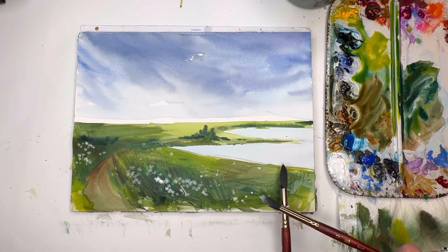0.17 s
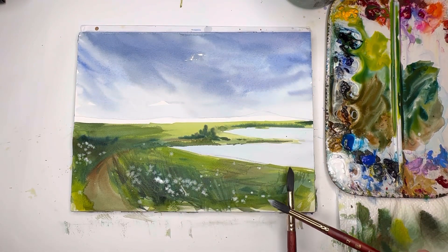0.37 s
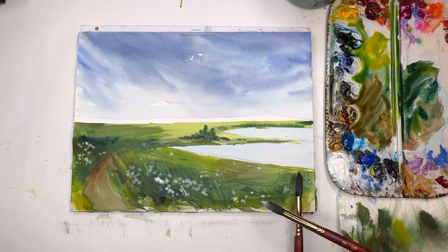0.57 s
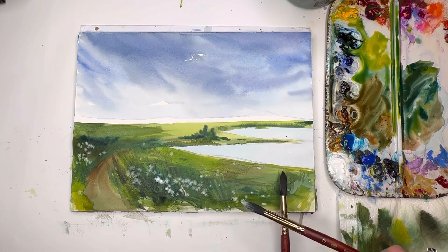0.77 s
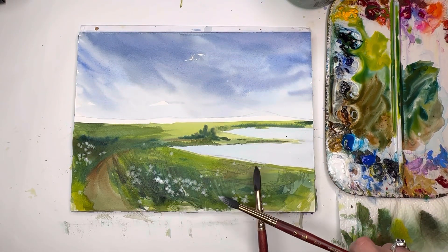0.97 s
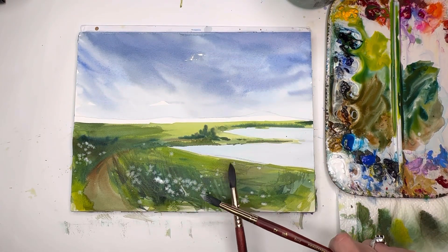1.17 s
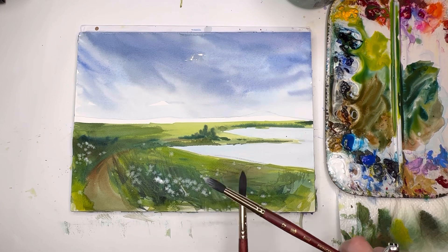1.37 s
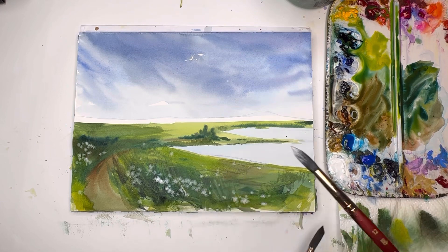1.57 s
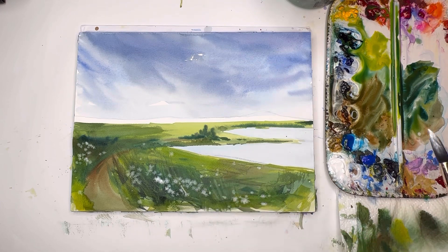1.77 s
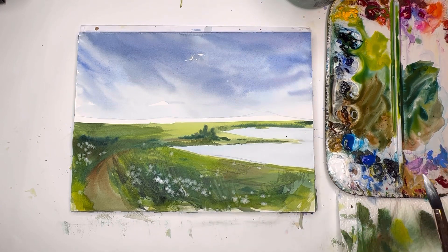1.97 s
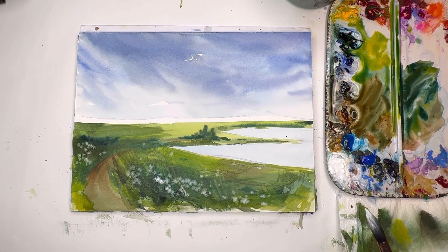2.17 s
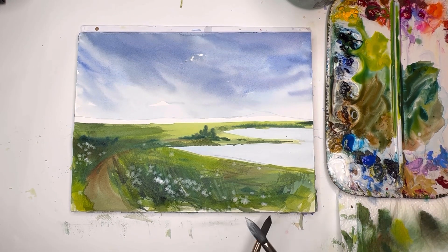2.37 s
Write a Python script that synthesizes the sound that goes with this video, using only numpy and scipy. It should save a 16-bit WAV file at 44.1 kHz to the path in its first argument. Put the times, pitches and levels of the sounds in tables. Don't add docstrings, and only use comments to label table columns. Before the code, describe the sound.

Two paintbrush handles knock together in nine quick, bright, even clicks in a small room

```python
import sys
import numpy as np
from scipy import signal
from scipy.fft import rfft, irfft
from scipy.io import wavfile
from scipy.ndimage import uniform_filter1d

SR = 44100
rng = np.random.default_rng(int(sys.argv[2]) if len(sys.argv) > 2 else 0)


def voltage_ratio(decibels):
    exponent = np.asarray(decibels, float) / 20
    return 10 ** exponent


def store_pcm(level_fs):
    pcm = np.round(np.clip(level_fs, -1, 1) * 32767).astype(np.int16)
    wavfile.write(sys.argv[1], SR, np.atleast_2d(pcm).T)


N = 106457
PAD = 441

KNOCK_S = [-.0008, .1789, .3275, .4950, .6490, .8283, 1.0018, 1.1593, 1.3112]
# (peak level [dB], low ring [dB], middle ring [dB], high ring [dB])
KNOCKS = [
    (-4.5, -1.5, -5, 5),
    (-2, -5, 2, 2.5),
    (-10, -13, -1.5, 4),
    (-4.5, 4, 5, 2.5),
    (-6, 4, 1.5, 0.5),
    (-5, 3, -2.5, 5),
    (-2.5, 3.5, -1, 6.5),
    (-7, 1, 0.5, 1),
    (-10.5, -7, 2, 2),
]
# (handle ring [dB], thud [dB], crack [dB], room snap [dB])
GRIP = [
    (2, -11, -8.5, 4.5),
    (2.5, 4.5, 3, 0),
    (3.5, -20, 5.5, 5.5),
    (0, -13, -3, 0),
    (2, -15, 2.5, -2.5),
    (-3, -7, -10.5, -14.5),
    (-10, 16, 1.5, -6.5),
    (0.5, -12.5, 4.5, 1.5),
    (2, -6, 1.5, -15.5),
]
# (low [Hz], middle [Hz], high [Hz])
SPOT_HZ = [(4900, 7850, 10400), (4670, 7300, 10300), (5250, 6750, 10300), (5400, 7150, 10100),
           (5250, 7700, 11300), (5250, 7500, 10400), (5450, 7400, 10050), (5500, 7600, 10750),
           (5400, 7350, 10600)]
# (low [Hz], middle [Hz], high [Hz])
USUAL_RING_HZ = (5250, 7400, 10400)
CHATTER_S = [.0017, .0013, .0015, .0009, .0014, .0013, .0013, .0014, .0013]
BOUNCE_S = [.0058, .3351, .3408, .499, .6582, .6652, .8435, 1.0113, 1.0169, 1.1705, 1.175, 1.3242]
BOUNCE_DB = [-15, -17, -33.5, -28, -16, -18.5, -13.5, -21, -11.5, -13, -22.5, -24.5]
# (frequency [Hz], level [dB], T60 [s])
LOW_RING = [(4416, -21, 0.0043), (5240, -9, .022), (5775, -10.5, 0.0085)]
MID_RING = [(6630, -10, 0.014), (7364, -5, 0.017), (8026, -12.5, 0.014)]
HIGH_RING = [(10396, -4.5, 0.0096), (11600, -8, 0.0057), (12900, -20.5, 0.01052), (13810, -25, 0.0046)]
# (frequency [Hz], level [dB], T60 [s])
HANDLE = [(955, -22.5, 0.025), (1032, -31, 0.039), (1130, -32.5, 0.021), (1830, -36, 0.018),
          (2580, -22, 0.0053), (3070, -14, 0.0039)]
# (frequency [Hz], level [dB])
CRACK = [(600, -47.5), (1200, -13.5), (2500, -16), (5000, 2), (9000, -3.5), (13000, -5), (15500, -17.5),
         (17000, -36)]
# (time [s], level [dB])
TICKS = [
    (1.669, -44),
    (2.232, -49),
    (2.2538, -68),
    (2.3869, -39.5),
    (2.402, -49),
]
# (frequency [Hz], T60 [s])
ROOM_T60 = [(500, 0.2077), (1000, .26), (1900, 0.35), (3500, 0.23), (9000, 0.25), (15000, .22)]
# (frequency [Hz], level [dB])
ROOM_TINT = [(500, -8.5), (1000, -4), (1900, -3.5), (5000, -0.5), (8000, -2.5), (11000, -9.5), (14600, -3),
             (16000, -22.5)]
# (frequency [Hz], level [dB per Hz])
HISS = [(200, 0), (350, -2), (480, -7), (900, -10), (1600, -13), (6300, -14), (10000, -13), (16000, -23)]
# (frequency [Hz], level [dB per Hz])
RUMBLE = [(4.7, -30), (8.0, 8), (16, 6.5), (27, -11.5), (65, -11), (147, -25), (200, -26), (260, -63),
          (440, -120)]
# (frequency [Hz], level [dB])
HUM = [(59.5, -62), (119.5, -75.5), (140, -72.5), (238, -82.5)]
# (time [s], level [dB])
BRISTLE = [
    (1.5, -76),
    (1.701, -77.5),
    (2.05, -102),
    (2.14, -73),
    (2.2, -87),
]
# (frequency [Hz], level [dB])
BRISTLE_TINT = [(4000, -23.5), (6000, -7), (9500, 1.5), (12500, -6), (15000, -27)]
# (time [s], level [dB], frequency [Hz], T60 [s])
JOLTS = [
    (2.356, -24.5, 25, .2),
    (2.397, -33, 16.4, 0.24),
]

RISE_S = 0.00013
CHATTER_DROP_DB, PARTING_S = -10.5, 0.00092
CRACK_DB, CRACK_T60_S, TICK_T60_S = -10.5, 0.016, 0.004
THUD_DB, THUD_S = -43.5, 0.00068
STICK_CUT_HZ = 1150
SPREAD_T60_S, SPREAD_CRACK_DB, SPREAD_WOOD_DB = 0.0035, 4, -8.5
NEAR_DB, NEAR_T60_S, NEAR_GAP_S = -3, 0.028, 0.0015
ROOM_DB, ROOM_RISE_S = -9.5, 0.0074
HISS_DB, RUMBLE_DB, HUM_WIDTH_HZ = -68, -50.5, 7.7
SCRAPE_S, SCRAPE_RISE_S = 2.352, 0.05
SCRAPE_DB, SCRAPE_HZ, SCRAPE_GRAIN_DB = -59, 1323, 4
MIC_TOP_HZ = 15600


def evened(x):
    return x / np.sqrt(np.mean(x ** 2) + 1e-20)


def read(points, hz):
    f, value = np.transpose(points)
    return np.interp(np.log(hz + 1), np.log(f + 1), value)


def add(mix, s, sound):
    part = mix[max(PAD + round(s * SR), 0):][:len(sound)]
    part += sound[:len(part)]


def coloured(x, points, lo_hz, hi_hz):
    hz = np.fft.rfftfreq(len(x), 1 / SR)
    band = (hz >= lo_hz) * (hz < hi_hz)
    return irfft(rfft(x) * voltage_ratio(read(points, hz)) * band, len(x))


def ring(modes, db, scale, t, phase):
    total = 0
    for (hz, level, t60), p in zip(modes, phase):
        total = total + voltage_ratio(db + level - 60 * t / t60) * np.sin(2 * np.pi * (hz * scale * t + p))
    return total


def knock(colour, grip, spot_hz, chatter_s, dice):
    t = np.arange(len(dice)) / SR
    handle_db, thud_db, crack_db, snap_db = grip
    metal = 0
    for k, modes in enumerate((LOW_RING, MID_RING, HIGH_RING)):
        phase = dice[1000 + 4 * k:]
        metal = metal + ring(modes, colour[k], spot_hz[k] / USUAL_RING_HZ[k], t, phase)
    crack = evened(coloured(dice, CRACK, 0, SR)) * voltage_ratio(CRACK_DB + crack_db - 60 * t / CRACK_T60_S)
    rise = np.minimum(t / RISE_S, 1)
    parting = np.clip((t - chatter_s) / PARTING_S, 0, 1)
    contact = rise * voltage_ratio(CHATTER_DROP_DB * parting)
    wood = rise * ring(HANDLE, handle_db, 0.99, t, np.zeros(len(HANDLE)))

    u = t / THUD_S
    thud = voltage_ratio(THUD_DB + thud_db) * u * np.exp(1 - u) * (1 - u / 2)

    impulse = 1. * (np.arange(len(t)) == round(RISE_S * SR))
    snap = coloured(impulse, CRACK, 0, SR) * voltage_ratio(SPREAD_CRACK_DB + snap_db) * (t < t[-1] / 2)
    spread = rise * metal * voltage_ratio(-60 * t / SPREAD_T60_S) + snap + voltage_ratio(SPREAD_WOOD_DB) * wood

    radiation = signal.butter(4, STICK_CUT_HZ, "high", fs=SR, output="sos")
    near, far = signal.sosfilt(radiation, [contact * (metal + crack) + wood, spread])
    return near, far, thud


def brushes():
    direct, feed = np.zeros(N + PAD), np.zeros((3, N + PAD))
    t = np.arange(3000) / SR
    dice = rng.standard_normal((40, 3000))
    times = KNOCK_S + BOUNCE_S
    levels = [row[0] for row in KNOCKS] + BOUNCE_DB
    for n, (s, db) in enumerate(zip(times, levels)):
        k = np.searchsorted(KNOCK_S, s, side="right") - 1
        near, far, thud = knock(KNOCKS[k][1:], GRIP[k], SPOT_HZ[k], CHATTER_S[k], dice[n])
        add(direct, s, voltage_ratio(db) * (near + thud * (n == k)))
        add(feed[n % 3], s, voltage_ratio(db) * far)
    for (s, db), noise in zip(TICKS, dice[::-1]):
        tick = evened(coloured(noise, CRACK, 0, SR)) * voltage_ratio(db - 60 * t / TICK_T60_S)
        add(direct, s, tick)
        add(feed[0], s, tick)
    return direct, feed


def room(feed):
    taps = rng.standard_normal((2, 3, SR // 2))
    t = np.arange(SR // 2) / SR
    near = taps[0] * voltage_ratio(-60 * t / NEAR_T60_S) * (t > NEAR_GAP_S)
    hz, frames, z = signal.stft(taps[1], SR, nperseg=256)
    decay_db = -60 * frames / read(ROOM_T60, hz)[:, None]
    tint_db = read(ROOM_TINT, hz)[:, None]
    tail = signal.istft(z * voltage_ratio(decay_db + tint_db), SR, nperseg=256)[1][:, :len(t)]
    tail = tail * np.clip((t - NEAR_GAP_S) / ROOM_RISE_S, 0, 1)
    both = voltage_ratio(NEAR_DB) * evened(near) + voltage_ratio(ROOM_DB) * evened(tail)
    return signal.fftconvolve(feed, both / np.sqrt(len(t)), axes=1).sum(0)[:N + PAD]


def background():
    a, b = rng.standard_normal((2, N))
    hiss = voltage_ratio(HISS_DB) * evened(coloured(a, HISS, 200, 17000))
    rumble = voltage_ratio(RUMBLE_DB) * evened(coloured(b, RUMBLE, 0, 200))
    hz = np.fft.rfftfreq(N, 1 / SR)
    lines = sum(voltage_ratio(db) / (1 + ((hz - f) / HUM_WIDTH_HZ * 2) ** 2) for f, db in HUM)
    hum = irfft(rfft(rng.standard_normal(N)) * lines, N) * np.sqrt(SR / HUM_WIDTH_HZ)
    return hiss + rumble + hum


def bristles():
    s, db = np.transpose(BRISTLE)
    level = np.interp(np.arange(N) / SR, s, db, left=-120, right=-120)
    return voltage_ratio(level) * evened(coloured(rng.standard_normal(N), BRISTLE_TINT, 0, SR))


def set_down():
    out, t = np.zeros(N + PAD), np.arange(4000) / SR
    for s, db, hz, t60 in JOLTS:
        sway = np.sin(2 * np.pi * hz * t) * np.minimum(t / 0.0063, 1)
        direction = -np.sign(hz - 20)
        add(out, s, direction * voltage_ratio(db - 60 * t / t60) * sway)
    pole = np.exp(-2 * np.pi * SCRAPE_HZ / SR)
    rub = evened(signal.lfilter([1], [1, -pole], rng.standard_normal(4000)))
    grain = evened(uniform_filter1d(rng.standard_normal(4000), 90))
    swell = np.minimum(t / SCRAPE_RISE_S, 1)
    add(out, SCRAPE_S, voltage_ratio(SCRAPE_DB + SCRAPE_GRAIN_DB * grain) * rub * swell)
    return out


def scene():
    direct, feed = brushes()
    struck = direct + room(feed) + set_down()
    return (struck[PAD:] + background() + bristles())[None]


def roll_off(x):
    return signal.sosfilt(signal.butter(12, 16540, fs=SR, output="sos"), x)


def record(dry):
    heard = signal.sosfilt(signal.butter(4, MIC_TOP_HZ, fs=SR, output="sos"), dry)
    return roll_off(np.clip(heard, -1, 1))


dry = scene()
out = record(dry)
store_pcm(out)
```